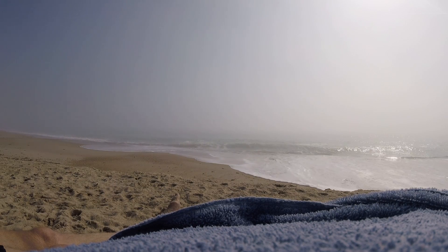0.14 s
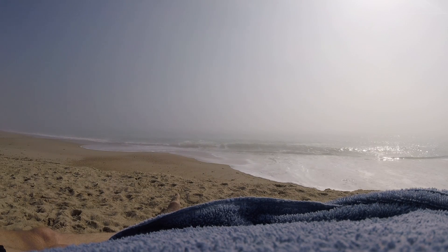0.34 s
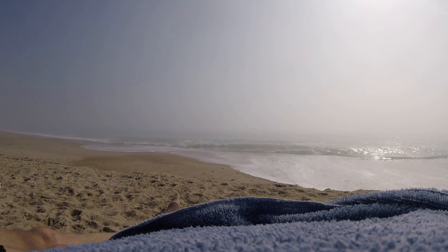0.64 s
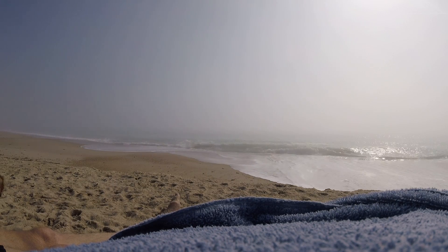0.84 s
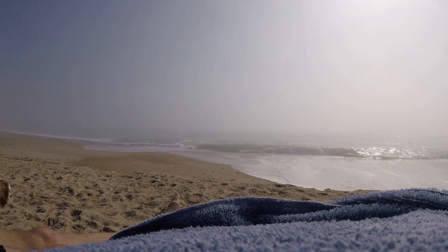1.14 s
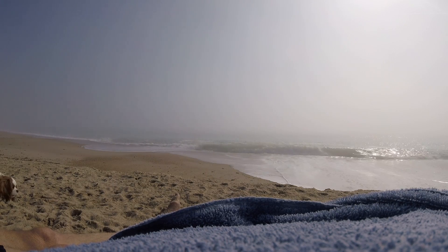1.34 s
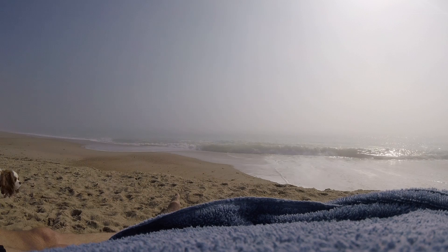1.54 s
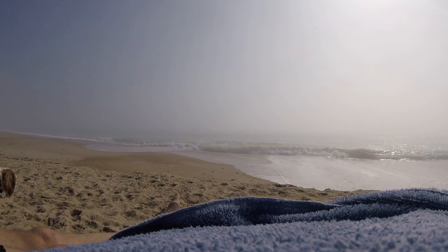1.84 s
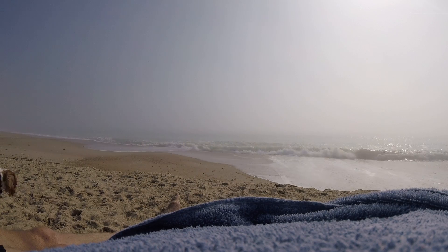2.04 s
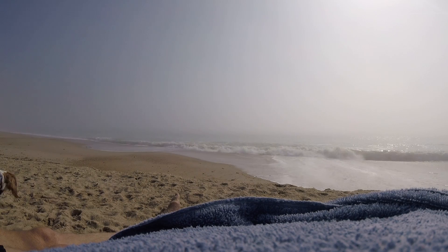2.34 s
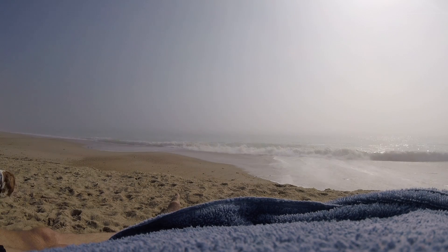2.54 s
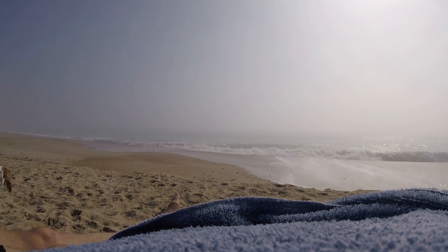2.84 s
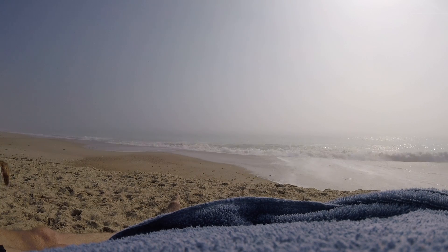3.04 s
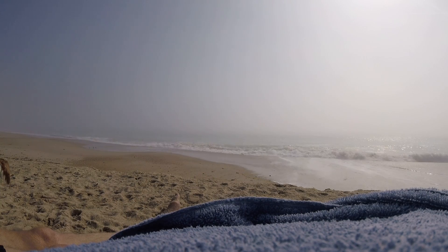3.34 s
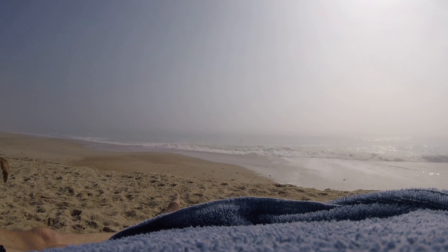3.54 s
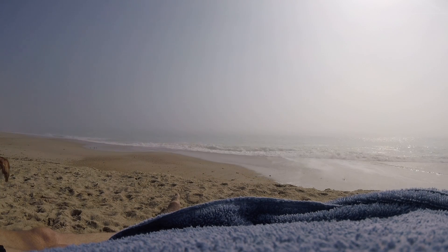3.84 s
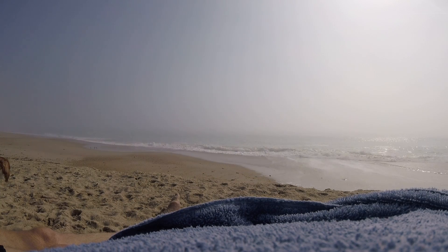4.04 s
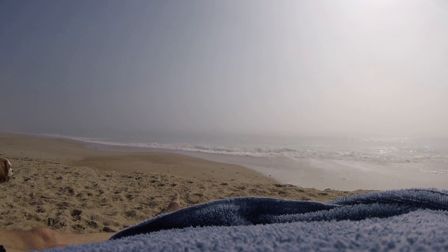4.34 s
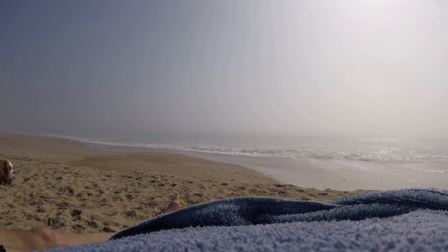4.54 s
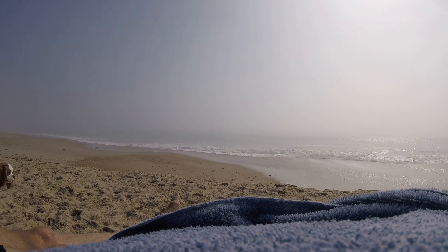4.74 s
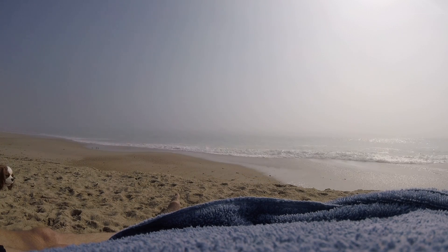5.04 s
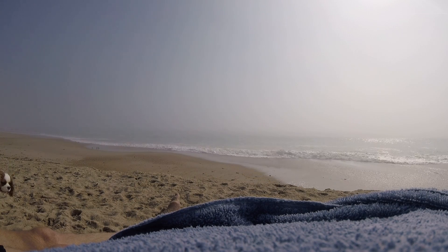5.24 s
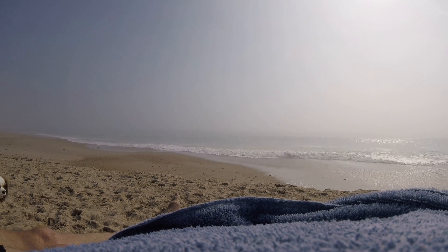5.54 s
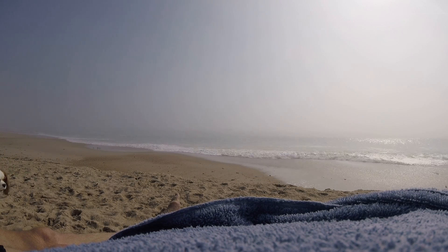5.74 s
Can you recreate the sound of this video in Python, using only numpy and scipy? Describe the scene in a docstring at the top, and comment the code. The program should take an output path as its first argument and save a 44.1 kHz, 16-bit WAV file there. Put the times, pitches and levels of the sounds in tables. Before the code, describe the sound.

An open sandy beach heard through a small camera low on a towel. Wind dominates in the bass: deep rumbling swings, faster flutter and short flapping thumps that last only a few hundredths of a second. At first the surf is only a faint wash under fairly light buffeting. From about 0.6 s the wind thickens, with a dense cluster of thumps from 0.9 to 1.6 s, strong enough to overload softly. Meanwhile a wave breaks some way off; its low tumbling roar swells to a peak near 2.1 s. Foam hiss grows behind it, fullest around 2.8 to 3.2 s, and the wash stays broad until about 3.9 s. It then drains to a softer rush by 4.9 s, with the hiss lifting slightly at the end. Wind knocks continue sparsely, regrouping around 5.2 to 5.5 s. The treble is muted and unevenly coloured, over very faint steady hiss.

```python
"""A sandy beach: a wave breaks some way off, its roar swells, then the foam hisses up the sand and drains back.
The surf is four bands of patchy noise riding level curves: plunge, roar, foam and spray.
Wind buffets the port of a small camera lying on a towel: slow noise swings, faster flutter, and
stronger eddies that flap past as short harmonic swings.
The housing colours the surf's treble with a plateau and steps; the microphone hisses faintly."""
import sys
import numpy as np
from scipy import signal
from scipy.fft import rfft, irfft, next_fast_len
from scipy.io import wavfile
from scipy.ndimage import uniform_filter1d, map_coordinates

SR = 44100
rng = np.random.default_rng(int(sys.argv[2]) if len(sys.argv) > 2 else 0)


def put_to_file(sound):
    """Save the sound as 16-bit audio at rate SR, in the file named by the first command-line argument."""
    columns = np.atleast_2d(sound).T  # one column per channel
    safe = np.clip(columns, -1, 1)
    whole_steps = np.round(safe * 32767)
    wavfile.write(sys.argv[1], SR, whole_steps.astype(np.int16))


N = 259308

# The breaking wave before the housing: t/s, tumbling roar level/dB, foam hiss level/dB
WAVE_LEVELS = [(0.0, -42, -57), (0.35, -39.5, -53), (1.0, -34, -48.5), (1.4, -31.5, -45),
               (1.76, -29, -43.5), (2.1, -27, -41), (2.8, -28, -39.5), (3.2, -28, -38.5), (3.9, -29, -39.5),
               (4.4, -32.5, -42.5), (4.85, -34.5, -45), (5.6, -35, -46), (5.88, -34.5, -44)]
# Noise spectra, only the shape counts: f/Hz, level per Hz/dB
# Thud of large air pockets
PLUNGE_SPECTRUM = [(50, -23), (110, -1.5), (200, 1), (350, -5.5), (600, -13.5), (1200, -34), (4000, -120)]
# Roar of tumbling water
ROAR_SPECTRUM = [(150, -24), (400, -2.5), (600, -1), (1000, -1), (1500, -4.5), (2200, -9.5), (3000, -16),
                 (4500, -23.5), (9000, -45), (15000, -75)]
# Hiss of fine bubbles
FOAM_SPECTRUM = [(800, -44), (2500, -3.5), (4000, 0), (6000, -1.5), (8000, -9.5), (15000, -52)]
# Sizzle of the finest bubbles
SPRAY_SPECTRUM = [(2000, -34), (6000, -3), (7500, 1), (9000, -3.5), (11000, -7), (15000, -15.5)]
# Wind strength on the port, dipped while an eddy covers it: t/s, level/dB
WIND_STRENGTH = [(0.0, -31), (0.06, -25), (0.45, -30), (0.53, -24.5), (0.66, -29), (0.8, -22.5),
                 (1.05, -18), (1.45, -19.5), (1.75, -22.5), (2.1, -20.5), (2.5, -19.5), (2.72, -24),
                 (2.9, -21.5), (3.17, -24), (3.35, -21), (3.8, -22.5), (4.12, -26.5), (4.25, -24),
                 (4.45, -24.5), (5.1, -26), (5.3, -22), (5.5, -27), (5.7, -22), (5.88, -22.5)]
# Slow pressure swings of the wind: f/Hz, level per Hz/dB
BUFFET_SPECTRUM = [(5, -44), (22, 6), (35, 7), (60, 3.5), (90, -1.5), (200, -55), (1000, -120)]
# Faster flutter of the wind: f/Hz, level per Hz/dB
FLUTTER_SPECTRUM = [(10, -63), (40, -6), (75, 2), (120, -1.5), (180, -7.5), (280, -22.5), (600, -76),
                    (2000, -120)]
# Eddies flapping past: start t/s, fundamental level/dB, nominal f/Hz, length/s, step per overtone/dB
EDDY_EVENTS = [(0.584, -9, 89, 0.018, -12), (0.676, -10.5, 115, 0.022, -5.5),
               (0.763, -10.5, 41.5, 0.058, -13), (0.908, -10, 104, 0.032, -17),
               (0.979, -10, 65, 0.032, -13), (1.027, -11, 80.4, 0.032, -10),
               (1.082, -10.5, 47.7, 0.043, -13), (1.135, -8, 60.4, 0.039, -9),
               (1.303, -8.5, 45.6, 0.052, -14), (1.392, -11.5, 114, 0.02, -3.5),
               (1.41, -12, 130, 0.011, -3.5), (1.429, -7, 84, 0.031, -11), (1.483, -5.5, 120.6, 0.018, -8),
               (1.537, -7, 80, 0.031, -14), (2.212, -9, 55.6, 0.077, -11), (2.419, -10, 89, 0.045, -21),
               (2.549, -9, 69, 0.035, -10), (2.63, -6.5, 115.6, 0.021, -19), (2.734, -8.5, 35, 0.05, -17),
               (3.033, -7.5, 75.6, 0.029, -16), (3.304, -12, 55.7, 0.036, -6), (3.489, -8, 73, 0.041, -9),
               (3.761, -10.5, 76.7, 0.035, -12), (4.022, -12, 45.5, 0.056, -11),
               (4.538, -8.5, 59.7, 0.029, -11), (4.573, -7, 153, 0.028, -19),
               (4.85, -10.5, 72.4, 0.025, -9), (5.243, -9.5, 67, 0.022, -14),
               (5.272, -11.5, 95.4, 0.028, -11), (5.295, -11, 125, 0.026, -11),
               (5.36, -9.5, 33.6, 0.077, -14), (5.428, -10.5, 64.5, 0.029, -9),
               (5.616, -8.5, 44.6, 0.058, -8), (5.757, -13, 110, 0.022, -10),
               (5.806, -17.5, 108, 0.019, -3)]
# Treble response of the housing: f/Hz, level/dB
HOUSING_RESPONSE = [(3000, 0), (4200, -6.5), (4900, 0.5), (6100, -0.5), (6600, -11.5), (10900, -8),
                    (11900, -18), (13000, -11.5), (15100, -19)]
# Microphone hiss, only the shape counts: f/Hz, level per Hz/dB
HISS_SPECTRUM = [(1000, -10), (7000, 0), (11000, -4), (15000, -10)]

ROAR_MID_DB = -32  # roar level at which the plunge sits PLUNGE_DB above it
PLUNGE_DB, PLUNGE_GROWS = 5, 1.105  # dB over the roar; dB per dB that the roar moves
SPRAY_DB, SPRAY_GROWS, SPRAY_FULL_DB = -44, 0.76, -30  # top level; dB per dB of roar; roar level at the top
SURGE_DB, SURGES_PER_S = 0.5, 5  # small surges in the roar
BUFFET_DB, FLUTTER_DB = 1, 0.47  # level over the wind strength
FLUTTER_GROWS = 0.21  # extra dB of flutter per dB of strength above its mean
PUFF_DB, PUFFS_PER_S = 2.5, 16  # the buffeting comes in puffs
LUMP_DB, LUMPS_PER_S = 2.5, 25  # the flutter is lumpy
COVER_DIP_DB = 6  # drop of the turbulence, buffeting and flutter alike, under one eddy at its fullest
HISS_DB, ROUNDING_LEVEL = -69, 0.75  # microphone hiss rms; amplitude ceiling of the soft rounding
TOP_HZ = 15230  # band limit


def surf():
    """Large air pockets thud, tumbling water roars, fine bubbles hiss and the finest ones sizzle."""
    roar_db, foam_db = curves(WAVE_LEVELS)
    plunge_db = ROAR_MID_DB + PLUNGE_DB + PLUNGE_GROWS * (roar_db - ROAR_MID_DB)
    spray_db = SPRAY_DB + SPRAY_GROWS * np.minimum(roar_db - SPRAY_FULL_DB, 0)
    surge_db = SURGE_DB * wobble(SURGES_PER_S)
    plunge = amp(plunge_db) * rush(PLUNGE_SPECTRUM, patchy_db=0.95)
    roar = amp(roar_db + surge_db) * rush(ROAR_SPECTRUM, patchy_db=0.6)
    foam = amp(foam_db) * rush(FOAM_SPECTRUM, patchy_db=0.45)
    spray = amp(spray_db) * rush(SPRAY_SPECTRUM, patchy_db=0.6)
    return plunge + roar + foam + spray


def housing(sound):
    """The housing shapes the treble on its way in, with a plateau and steps."""
    return coloured(sound, HOUSING_RESPONSE)


def wind():
    """Turbulence presses on the port in swings whose size follows the gusts, with eddies on top."""
    strength_db, = curves(WIND_STRENGTH)
    swings, cover = eddies()
    flutter_db = FLUTTER_DB + FLUTTER_GROWS * (strength_db - strength_db.mean())
    turbulence = amp(BUFFET_DB) * buffeting() + amp(flutter_db) * fluttering()
    # while an eddy covers the port it takes the place of the turbulence, slow buffeting and flutter alike
    return amp(strength_db - COVER_DIP_DB * cover) * turbulence + swings


def buffeting():
    """Slow turbulent pressure swings, partly evened out, then gathered into puffs."""
    steady = evened(rush(BUFFET_SPECTRUM, patchy_db=0.4), seconds=0.077, share=0.52)
    return unit(amp(PUFF_DB * wobble(PUFFS_PER_S)) * steady)


def fluttering():
    """Faster turbulent swings, partly evened out, then made lumpy."""
    steady = evened(rush(FLUTTER_SPECTRUM, patchy_db=0.2), seconds=0.029, share=0.38)
    return unit(amp(LUMP_DB * wobble(LUMPS_PER_S)) * steady)


def eddies():
    """Each eddy swings the pressure for a few cycles; also returns how far eddies cover the port."""
    out, cover = np.zeros(N + SR), np.zeros(N + SR)
    t = np.arange(SR // 10) / SR
    chance = rng.random((len(EDDY_EVENTS), 4))
    for (start, db, hz, length, tilt_db), turn in zip(EDDY_EVENTS, chance):
        swell = np.sin(np.pi * np.clip(t / length, 0, 1))
        # the eddy slows as it passes: pitch glides from 1.2 to 0.76 of nominal
        phase = 2 * np.pi * hz * t * (1.2 - 0.22 * t / length)
        swing = np.zeros(len(t))
        for k in range(4):  # fundamental and three overtones
            swing += amp(tilt_db * k) * np.sin((k + 1) * phase + 2 * np.pi * turn[k])
        first = round(start * SR)
        out[first:][:len(t)] += amp(db) * swell ** 2 * swing
        cover[first:][:len(t)] += swell
    return out[:N], cover[:N]


def microphone_hiss():
    """Faint steady noise of the microphone itself."""
    return amp(HISS_DB) * unit(coloured(rng.standard_normal(N), HISS_SPECTRUM))


def rush(spectrum, patchy_db):
    """Turbulent noise of rms 1, with patches of random gain across time and pitch."""
    cells = signal.stft(rng.standard_normal(N + 512), nperseg=512)[2]
    field = uniform_filter1d(rng.standard_normal(cells.shape), size=6, axis=0)  # blur in pitch
    field = uniform_filter1d(field, size=14, axis=1)  # blur in time
    patchy = signal.istft(cells * amp(patchy_db * unit(field)), nperseg=512)[1][:N]
    return unit(coloured(patchy, spectrum))


def evened(x, seconds, share):
    """x at rms 1 with a share of its own slow loudness swings divided out."""
    width = int(seconds * SR)
    power = uniform_filter1d(uniform_filter1d(x ** 2, width), width)
    size = np.sqrt(np.abs(power) + 1e-3)
    return unit(x / size ** share)


def coloured(x, points):
    """x through a spectrum of (f/Hz, level/dB) points joined on a log frequency axis."""
    m = next_fast_len(N + 8192)  # padded so that ringing does not wrap round
    hz, db = np.transpose(points)
    bins = np.fft.rfftfreq(m, 1 / SR)
    gain = amp(np.interp(np.log(bins + 1), np.log(hz + 1), db))
    return irfft(rfft(x, m) * gain, m)[..., :N]


def wobble(rate):
    """A smooth random curve with rate knots a second."""
    return map_coordinates(rng.standard_normal(400), [np.arange(N) * rate / SR])


def curves(rows):
    """One value per sample for each column after the time."""
    s, *cols = np.transpose(rows)
    return [np.interp(np.arange(N) / SR, s, c) for c in cols]


def amp(db):
    """Gain of a level in dB."""
    return 10 ** (np.asarray(db) / 20)


def unit(x):
    """x at rms 1."""
    return x / np.sqrt(np.mean(x ** 2) + 1e-20)


def scene():
    """The surf enters through the housing; the wind acts on the port directly."""
    return (housing(surf()) + wind())[None]


def record(dry):
    """The microphone adds hiss and rounds off the largest swings; the top is cut at the band limit."""
    hissing = dry + microphone_hiss()
    rounded = hissing / (1 + np.abs(hissing / ROUNDING_LEVEL) ** 4) ** (1 / 4)
    return coloured(rounded, [(TOP_HZ, 0), (TOP_HZ + 60, -120)])


dry = scene()
out = record(dry)
put_to_file(out)
```